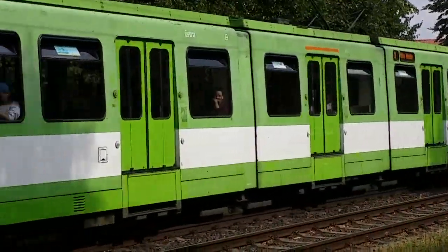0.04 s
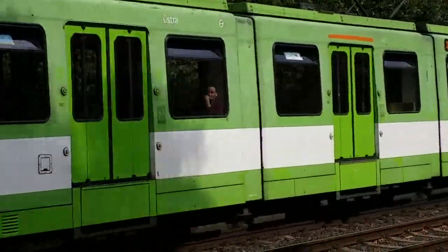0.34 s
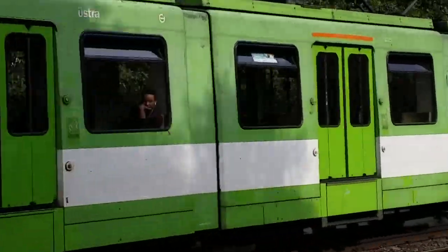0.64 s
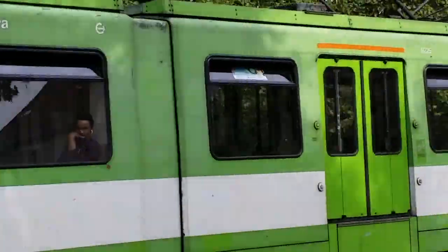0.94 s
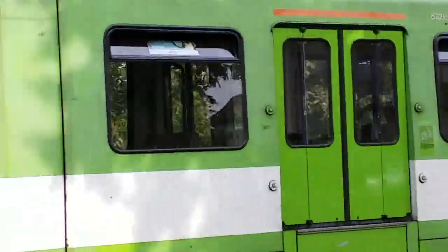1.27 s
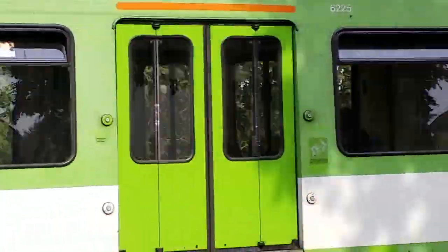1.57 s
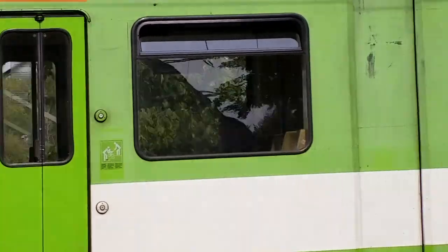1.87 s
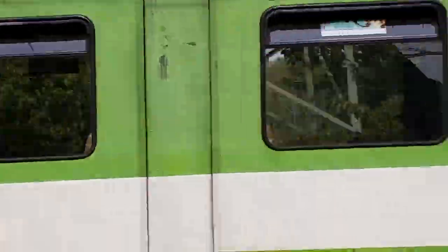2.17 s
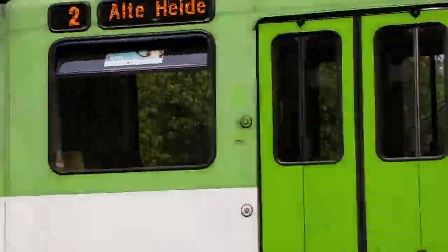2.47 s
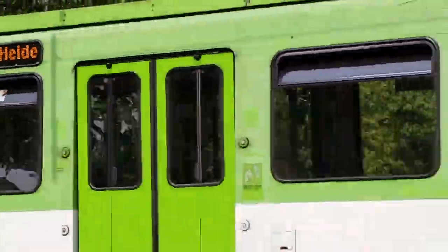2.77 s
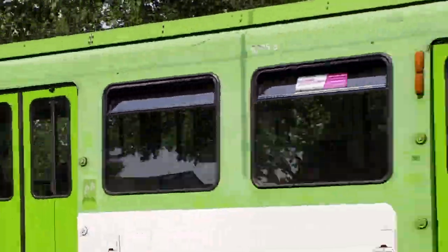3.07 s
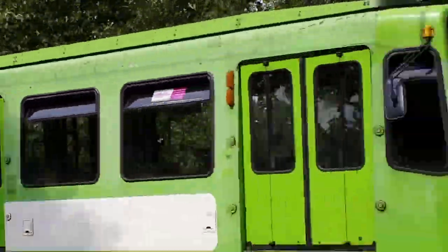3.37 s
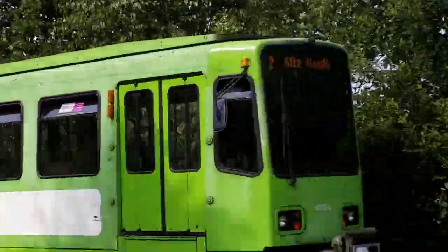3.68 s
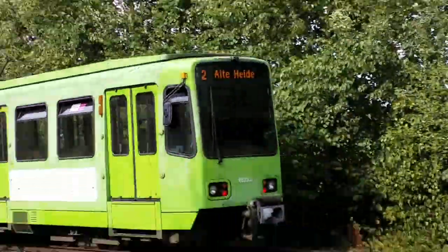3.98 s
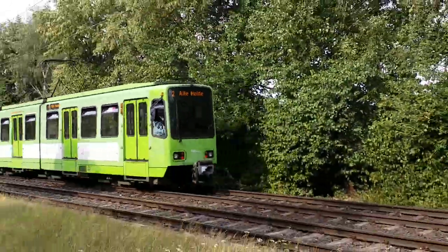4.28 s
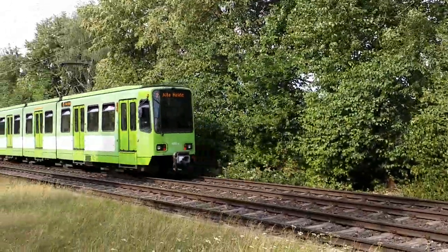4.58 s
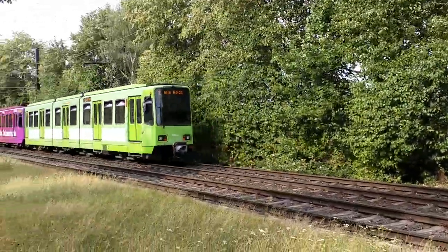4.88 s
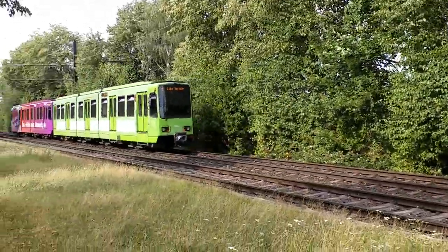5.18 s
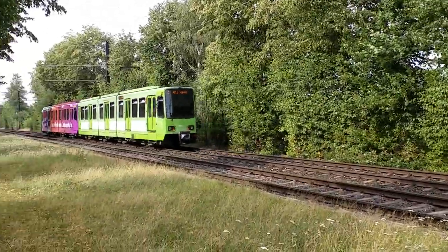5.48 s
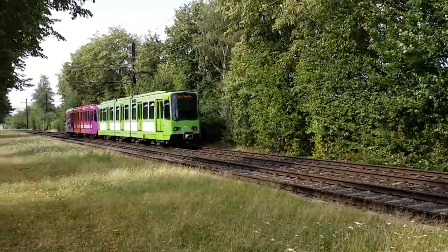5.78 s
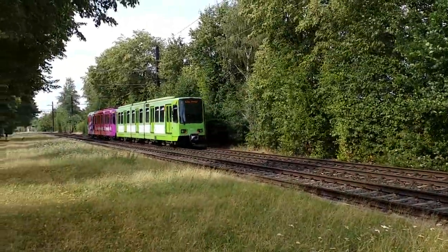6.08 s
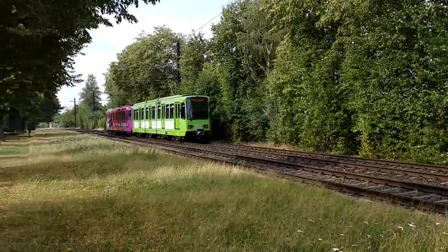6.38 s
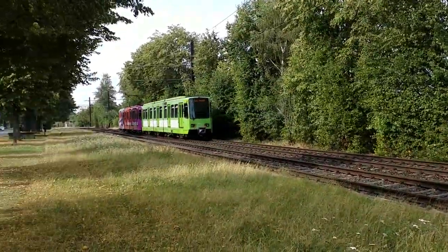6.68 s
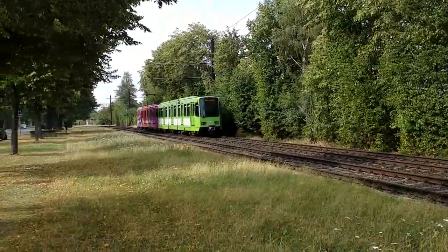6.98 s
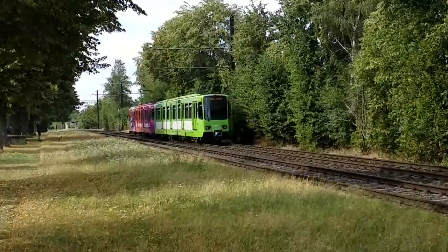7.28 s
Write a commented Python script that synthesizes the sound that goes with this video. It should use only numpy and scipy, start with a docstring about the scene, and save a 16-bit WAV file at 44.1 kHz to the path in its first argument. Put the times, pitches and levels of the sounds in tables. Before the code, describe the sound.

A tram rolls past close by with roaring, ringing steel wheels and wind thumping the microphone, then fades as the rails keep singing.

```python
"""Light-rail train passing on a grassy track

The microphone stands 7 m from a tree-lined track as the train rolls past and draws off. Rough steel
makes the wheels roar and ring, sinking in pitch as each bogie goes by; a gear whines thinly and a flat
spot knocks. The rails keep singing behind the train. Its slipstream thumps on the microphone, over a
smooth high hiss and faint outdoor noise."""
import sys
import numpy as np
from scipy.fft import rfft, irfft, next_fast_len
from scipy.io import wavfile
from scipy.ndimage import uniform_filter1d, minimum_filter1d, map_coordinates

SR = 44100
rng = np.random.default_rng(int(sys.argv[2]) if len(sys.argv) > 2 else 0)


def waveform_to_disk(signal):
    """Save audio, clipped to [-1, 1], as 16-bit WAV at the path in sys.argv[1]."""
    frames = np.transpose(np.atleast_2d(signal))
    scaled = np.clip(frames, -1, 1) * 32767
    samples = np.round(scaled).astype(np.int16)
    wavfile.write(sys.argv[1], SR, samples)


N = 332505
SPEED_M_PER_S, DISTANCE_M = 12.5, 7.0
LEAD_S = 0.1  # wheels radiate sideways and a little ahead, so they peak just before they are closest

# wheel roar from beside the track, then from far down the line: (frequency [Hz], relative level [dB])
NEAR_ROAR_SPECTRUM = [(150, -5), (300, 3.5), (410, -0.5), (560, 2.5), (780, -1.5), (900, -1.5),
                      (1120, -2.5), (1500, -9), (1950, -5), (2350, -6.5), (2900, -5.5), (3300, -9.5),
                      (5700, -10.5), (9000, -17.5), (15000, -68)]
FAR_ROAR_SPECTRUM = [(150, 8), (300, -7), (430, -3), (620, 4.5), (780, -4), (1050, 3), (1550, -1),
                     (2100, -3), (3000, -7.5), (4200, -7), (5500, -5.5), (9000, -35), (15000, -60)]
# track resonances heard only close by: (frequency [Hz], half-width [Hz], relative level [dB])
TRACK_MODES = [(342, 31, 2), (502, 30, 1.5), (810, 60, -4.5), (2077, 130, 1), (2640, 270, -6),
               (4350, 90, -10.5), (6600, 470, -8.5), (7150, 120, -5.5)]

def roar():
    """Rough steel rolls on steel; the colour of the roar changes as the train draws off."""
    near = amp(3) * rush(colour(NEAR_ROAR_SPECTRUM), abreast_db=-3)
    track = amp(-4) * rush(resonances(TRACK_MODES), abreast_db=-18) * amp(1.6 * wobble(17))
    far = amp(4.5) * rush(colour(FAR_ROAR_SPECTRUM), spread_db=1.5, abreast_db=-1)
    gain_db = receding(-29, leaves_s=2.56, fall_db=19.13) + 0.4 * wobble(12)
    return amp(gain_db) * near_to_far(near + track, far) * pan(-0.33)


# car bodies at close range: (frequency [Hz], relative level [dB])
BODY_SPECTRUM = [(20, -26), (40, -10.5), (70, -2), (120, 5), (180, 2.5), (230, -2.5), (305, -1),
                 (390, -13.5), (700, -40), (2000, -76)]
# their drone from afar: (frequency [Hz], half-width [Hz], relative level [dB])
DRONE_MODES = [(114, 46, -0.5), (184.6, 16.4, 4), (290, 86, -9.5)]

def rumble():
    """Rolling shakes the car bodies: a rumble alongside, a drone in the distance."""
    level_db = receding(-24, leaves_s=2.44, fall_db=17.6) + 0.88 * wobble(14)
    body = near_to_far(rush(colour(BODY_SPECTRUM)), rush(resonances(DRONE_MODES)))
    return amp(level_db) * body * pan(-1.9)


# wheels of the middle and end bogies: (frequency [Hz], half-width [Hz], relative level [dB])
MIDDLE_WHEEL_MODES = [(531, 47, -6.5), (677, 39, -4.5), (1298, 72, 5.5), (2088, 180, -8), (2850, 63, -16),
                      (3870, 110, -16.5), (4620, 70, -16)]
END_WHEEL_MODES = [(290, 34, 6.5), (640, 62, 6.5), (1122, 63, 5.5), (2730, 80, 0.5), (3740, 110, -10),
                   (4700, 120, -11)]
# bogies passing the microphone: (time when closest [s], level [dB], place under the car)
BOGIE_PASSES = [(.35, -34, "middle"), (1.402, -41, "end"), (1.95, -24.5, "middle"),
                (2.469, -26.5, "middle"), (3.22, -30.5, "end")]

def bogies():
    """The rough rail stirs each bogie's wheels; their ring swells, sinks in pitch and fades."""
    modes = {"middle": MIDDLE_WHEEL_MODES, "end": END_WHEEL_MODES}
    out = np.zeros((2, N))
    for closest_s, db, place in BOGIE_PASSES:
        ring = rush(resonances(modes[place]), spread_db=-7, abreast_db=-11)
        emitted_at = np.cumsum(doppler(closest_s))
        heard = np.array([map_coordinates(side, [emitted_at], order=1, mode="wrap") for side in ring])
        level_db = passing(db, closest_s - LEAD_S, fall_db=34.5) + 0.8 * wobble(16)
        out += amp(level_db) * heard
    return out * pan(-0.5)


# rail resonances that carry far: (frequency [Hz], half-width [Hz], relative level [dB])
RAIL_MODES = [(1066, 21, -8.5), (1212, 41, 2.5), (1296, 63, -0.5), (1540, 31, -11)]
# rough stretches of rail that swell the song: (time [s], rise [dB], length [s])
ROUGH_STRETCHES = [(1.15, 5, 0.16), (2.2, 3, 1.0), (4.85, 3.5, 0.21), (5.9, 3.2, 0.86), (7.35, 2.5, 0.3)]

def rails():
    """The rails stay put, so their song keeps its pitch and carries on long after the train."""
    song = rush(resonances(RAIL_MODES), spread_db=0, abreast_db=-12)
    rough_db = sum(rise_db * swell(s, length) for s, rise_db, length in ROUGH_STRETCHES)
    level_db = receding(-32.5, leaves_s=2.8, fall_db=11.1) + rough_db + 0.32 * wobble(16)
    return amp(level_db) * song * pan(-2)


# strikes near the microphone, one a wheel turn: (rail ring [dB], wheel ring [dB], thud [dB])
FLAT_SPOT_STRIKES = [(-16, -22, -23), (-6, -20, -32), (-11, -17, -28), (-5.5, -33, -8.5), (-10.5, -26, -23),
                     (-22, -24.5, -22)]

def flat_spot(first_s=2.072, turn_s=0.1785, attack_s=0.0024):
    """A flat spot on one wheel strikes once a turn, ringing rail and wheel briefly over a thud."""
    out = np.zeros(N + SR)
    t = np.arange(SR // 5) / SR

    def ring(db, hz, t60_s):
        """A dying tone whose phase is blurred by many close modes."""
        drift = 0.049 * np.cumsum(uniform_filter1d(rng.standard_normal(len(t)), size=30))
        return amp(db - 60 * t / t60_s) * np.sin(2 * np.pi * hz * t + drift)

    for turn, (rail_db, wheel_db, thud_db) in enumerate(FLAT_SPOT_STRIKES):
        rail = ring(rail_db, hz=1265, t60_s=0.061)
        wheel = ring(wheel_db, hz=2130, t60_s=0.122)
        thud = ring(thud_db, hz=260, t60_s=0.065)
        start = round((first_s + turn * turn_s) * SR)
        out[start:][:len(t)] += (rail + wheel + thud) * (1 - np.exp(-t / attack_s))
    return out[:N]


def gear(mesh_hz=1001, closest_s=2.5):
    """One gear mesh whines thinly and sinks in pitch as it passes the microphone."""
    heard_hz = mesh_hz * doppler(closest_s) * (1 + 0.003 * wobble(60))
    whine = np.sin(2 * np.pi * np.cumsum(heard_hz) / SR)
    level_db = passing(-36.5, closest_s - LEAD_S, fall_db=36) + 1.6 * wobble(23)
    return amp(level_db) * unit(whine)


# gusts reaching the trackside: (time [s], level [dB], length [s])
SLIPSTREAM_GUSTS = [(0.135, -19.5, 0.12), (0.79, -25.5, 0.24), (1.17, -21.5, .36), (3.524, -25.5, 0.1),
                    (4.394, -28.5, 0.76), (5.607, -36.5, 0.8), (6.95, -52, 0.22)]
# single eddies on the microphone: (time [s], rms level [dB], length [s], corner frequency [Hz])
EDDIES = [(.18, -14.5, 0.03, 122), (.243, -14, 0.017, 150), (0.724, -14.5, 0.052, 152),
          (.825, -5, 0.022, 215), (.89, -15, .039, 240), (.936, -12, 0.038, 202),
          (1.098, -17.5, 0.033, 129), (1.264, -22, 0.031, 155), (3.472, -14, 0.076, 250),
          (3.595, -12, 0.024, 162), (3.627, -9.5, 0.018, 184), (3.865, -20, 0.012, 150),
          (3.906, -19.5, 0.029, 110), (4.205, -24.5, 0.064, 171), (4.287, -21, 0.026, 247),
          (4.39, -22.5, 0.028, 175), (4.535, -19.5, 0.023, 126), (4.783, -21, 0.043, 155),
          (5.874, -28, 0.04, 120)]

def slipstream():
    """Air dragged along by the train flutters on the microphone, and single eddies thump it."""
    gusts = sum(amp(db) * swell(s, length) for s, db, length in SLIPSTREAM_GUSTS)
    flow = amp(receding(-34.5, leaves_s=3.77, fall_db=39)) + gusts
    air = flow * amp(3.3 * wobble(25)) * turbulence(N, corner_hz=134)
    half = SR // 6
    t = np.arange(-half, half) / SR
    thumps = np.zeros((2, N + SR))
    for s, db, length, corner_hz in EDDIES:
        puff = np.exp(-np.pi / 2 * (t / length) ** 2) * turbulence(len(t), corner_hz)
        thumps[:, round(s * SR):][:, :len(t)] += amp(db) * unit(puff) * np.sqrt(length * SR / len(t))
    wake = swell(at_s=4.2, length_s=1.6)  # meets the right port more squarely
    return (air + thumps[:, half:half + N]) * pan(-5 - 3.5 * wake)


def turbulence(size, corner_hz, low_hz=52, width=0.38):
    """Pressure of eddies on the two microphone ports; a higher corner stands for faster air."""
    low_cut = lambda hz: 1 / np.hypot(1, (low_hz / (hz + 1)) ** 8.7)
    band = lambda hz: low_cut(hz) / np.hypot(1, (hz / corner_hz) ** 2.28)
    mid, side = filtered(rng.standard_normal((2, size)), band)
    return unit(np.array([mid + width * side, mid - width * side]))


# hiss to the right of the microphone: (frequency [Hz], relative level [dB])
HISS_SPECTRUM = [(2500, -8.5), (4500, -32), (5400, -9), (6100, -3), (6500, -1.5), (7200, 0.2), (8000, -4),
                 (9000, -2), (9800, 0), (10700, -10), (12000, -15.5), (13500, -26.5), (15700, -43)]

def hiss():
    """A smooth high hiss, a little stronger as the middle of the car goes by, then slowly fading."""
    level_db = receding(-36, leaves_s=3.6, fall_db=6.94) + 1.9 * swell(at_s=2.2, length_s=1.5)
    return amp(level_db + 0.3 * wobble(5.4)) * rush(colour(HISS_SPECTRUM)) * pan(-6)


# open air around the track: (frequency [Hz], relative level [dB])
OUTDOOR_SPECTRUM = [(100, -4.5), (250, -10), (420, -10), (800, -6), (1000, -10), (1600, -5), (2500, -21),
                    (8000, -37)]

def background():
    """The faint steady outdoor noise that remains as the train fades."""
    return amp(-49) * rush(colour(OUTDOOR_SPECTRUM))


# likeness of left and right at close range: (frequency [Hz], correlation [0-1])
STEREO_LIKENESS = [(50, 0.84), (200, 1), (600, 0.99), (1300, 0.88), (1650, 0.88), (2400, 0.65),
                   (4400, 0.44), (8000, .72), (12000, .62)]

def rush(response, spread_db=4.0, abreast_db=0):
    """Stereo noise of rms 1; its width shifts by abreast_db at the pass, spread_db far off in the trees."""
    def mid_and_side(hz):
        angle = np.arccos(np.clip(along(STEREO_LIKENESS, hz), 0, 1)) / 2
        return response(hz) * np.array([np.cos(angle), np.sin(angle)])

    mid, side = filtered(rng.standard_normal((2, N)), mid_and_side)
    abreast = swell(at_s=2.95, length_s=2)  # the nearest wheels face the microphone
    side = side * amp(spread_db * farness() + abreast_db * abreast)
    return unit(np.array([mid + side, mid - side]))


def travelled(since_s):
    """Metres that the train has run since the given moment."""
    return SPEED_M_PER_S * (np.arange(N) / SR - since_s)


def doppler(closest_s, sound_m_per_s=343):
    """Pitch ratio at the microphone of a point of the train going by."""
    past_m = travelled(closest_s)
    return 1 / (1 + SPEED_M_PER_S / sound_m_per_s * past_m / np.hypot(past_m, DISTANCE_M))


def passing(level_db, peak_s, fall_db):
    """Level in dB of a point that nears and leaves, losing fall_db per tenfold distance."""
    return level_db - fall_db * np.log10(np.hypot(1, travelled(peak_s) / DISTANCE_M))


def receding(level_db, leaves_s, fall_db):
    """Level in dB of the whole train: steady alongside, then losing fall_db per tenfold distance."""
    return np.where(travelled(leaves_s) < 0, level_db, passing(level_db, leaves_s, fall_db))


def farness(midway_s=4.27, fade_s=0.7):
    """0 while the train is alongside, 1 once it has drawn off."""
    return (1 + np.tanh((np.arange(N) / SR - midway_s) / fade_s)) / 2


def near_to_far(near, far):
    """Equal-power crossfade from the close sound to the distant one."""
    share = farness()
    return np.sqrt(1 - share) * near + np.sqrt(share) * far


def swell(at_s, length_s):
    """A bell curve of height 1 around at_s."""
    return np.exp(-np.pi * ((np.arange(N) / SR - at_s) / length_s) ** 2)


def wobble(rate):
    """A smooth random curve, rate knots a second."""
    knots = rng.standard_normal(int(N * rate / SR) + 4)
    return map_coordinates(knots, [np.arange(N) * rate / SR])


def along(points, hz):
    """(Hz, value) points read on a log axis."""
    point_hz, values = np.transpose(points)
    return np.interp(np.log(hz + 1), np.log(point_hz + 1), values)


def colour(points):
    """The response of a (Hz, dB) spectrum."""
    return lambda hz: amp(along(points, hz))


def resonances(modes):
    """The response of steep-sided modes, summed in power."""
    return lambda hz: np.sqrt(sum((amp(db) / (1 + ((hz - centre) / half_width) ** 2)) ** 2
                                  for centre, half_width, db in modes))


def filtered(x, response):
    """x shaped by a frequency response."""
    size = x.shape[-1]
    padded = next_fast_len(size + SR // 10, True)
    spectrum = rfft(x, padded) * response(np.fft.rfftfreq(padded, 1 / SR))
    return irfft(spectrum, padded)[..., :size]


def pan(left_db):
    """Gains of the two channels for a left-minus-right level difference."""
    return amp(np.array([[1], [-1]]) * left_db / 2)


def amp(db):
    """Decibels to gain."""
    return 10 ** (np.asarray(db) / 20)


def unit(x):
    """x scaled to rms 1."""
    return x / np.sqrt(np.mean(x ** 2) + 1e-20)


def scene():
    """Train, track and air as heard from the trackside."""
    train = roar() + rumble() + bogies() + gear() + flat_spot()
    return train + rails() + slipstream() + hiss() + background()


def record(dry):
    """The camera eases down peaks that would overload it and keeps nothing above its band limit."""
    ceiling, top_hz = 0.97, 15719
    needed_gain = np.minimum(1, ceiling / (np.abs(dry).max(axis=0) + 1e-9))
    gain = uniform_filter1d(minimum_filter1d(needed_gain, size=401), size=401)
    return filtered(dry * gain, lambda hz: hz < top_hz)


dry = scene()
out = record(dry)
waveform_to_disk(out)
```